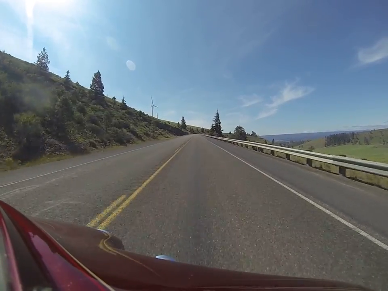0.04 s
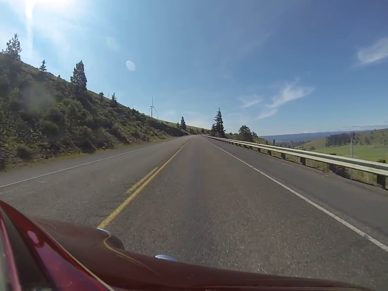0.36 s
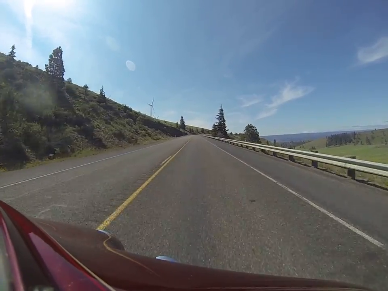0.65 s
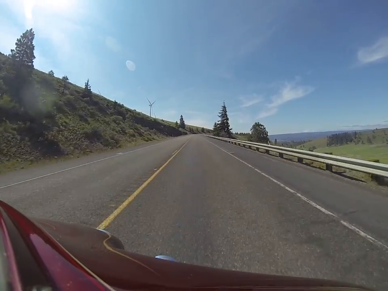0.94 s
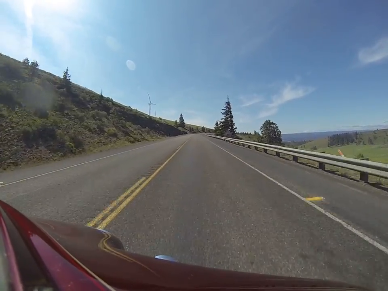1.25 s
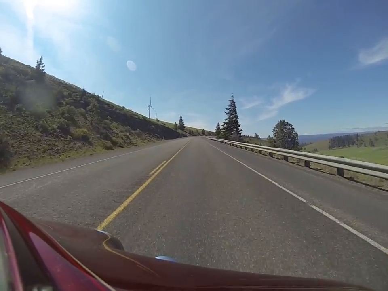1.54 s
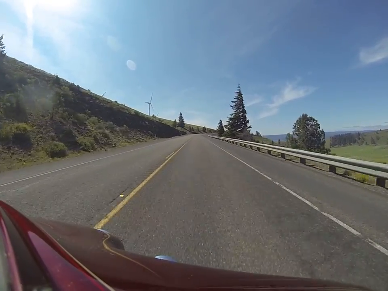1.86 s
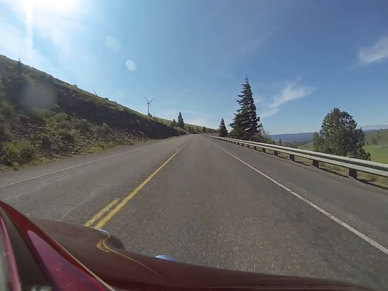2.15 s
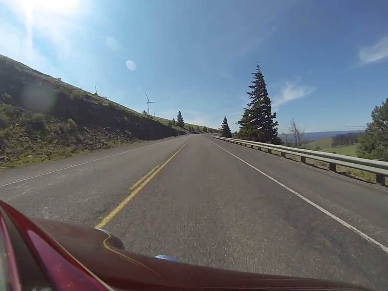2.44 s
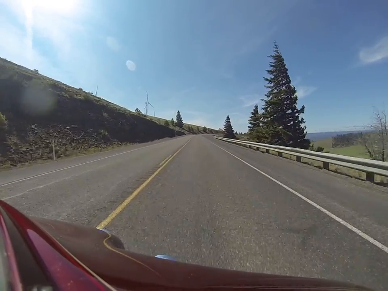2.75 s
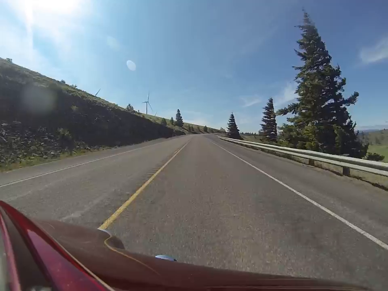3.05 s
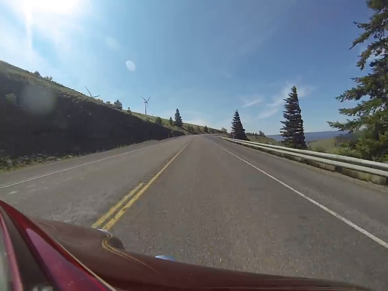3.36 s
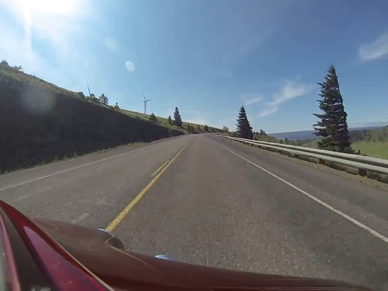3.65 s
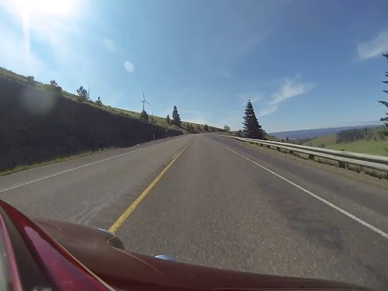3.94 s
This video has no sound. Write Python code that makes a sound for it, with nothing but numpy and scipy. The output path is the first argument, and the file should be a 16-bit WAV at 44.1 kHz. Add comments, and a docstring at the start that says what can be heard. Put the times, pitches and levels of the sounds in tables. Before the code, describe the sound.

A car driving along, with a steady low road roar under gusty wind hiss.

```python
"""A low roar under a gusty hiss: a vehicle cruises an open road, heard from a camera on its bodywork.
Rough asphalt drives the body into forced vibration, with a faint drone of wheels and engine in it.
Turbulent air rushes over the camera housing and excites the resonance of its hollow near 1.4 kHz.
The hiss and a soft low buffeting swell and drop together with the gusts."""
import sys
import numpy as np
from scipy import signal
from scipy.fft import rfft, irfft
from scipy.io import wavfile
from scipy.ndimage import uniform_filter1d, minimum_filter1d

SR = 44100
rng = np.random.default_rng(int(sys.argv[2]) if len(sys.argv) > 2 else 0)


def output_pcm(signal):
    """Save a mono or channel-first signal as 16-bit PCM at the path in sys.argv[1].

    Samples are clipped to [-1, 1] before scaling.
    """
    pcm = np.clip(np.atleast_2d(signal).T, -1, 1) * 32767
    wavfile.write(sys.argv[1], SR, np.round(pcm).astype(np.int16))


N = 176400

# Strength of the airstream. Each row: time in seconds, level in dB.
GUSTS = [(0, -30), (0.15, -20), (0.21, -27.5), (0.28, -23), (0.39, -23), (0.42, -25), (0.57, -23),
         (0.61, -25), (0.78, -26.5), (0.86, -22.0), (1.14, -23.5), (1.18, -27.5), (1.29, -23),
         (1.41, -25.5), (1.45, -29.5), (1.49, -27), (1.56, -28.5), (1.63, -24.5), (1.69, -31.5),
         (1.76, -25.5), (1.94, -22), (1.98, -26.0), (2.02, -20.5), (2.07, -26), (2.2, -22.8), (2.5, -23.5),
         (2.72, -22), (3.06, -23), (3.13, -26), (3.19, -23), (3.4, -24), (3.47, -26), (3.66, -23.4),
         (3.78, -24), (4.0, -25.5)]


def amp(db):
    """Amplitude ratio of a level: a factor of ten for every 20 dB."""
    return 10 ** (np.asarray(db) / 20)


def unit_rms(x):
    """Normalisation to a mean power of one."""
    return x / np.sqrt(np.mean(x ** 2) + 1e-20)


def spectrum_db(points, hz):
    """Interpolation of a spectrum in dB along a logarithmic frequency axis."""
    point_hz, db = np.transpose(points)
    return np.interp(np.log(hz + 1), np.log(point_hz + 1), db)


def curve(points, t):
    """Linear interpolation of a control curve at the times t."""
    return np.interp(t, *np.transpose(points))


def noise(gain):
    """Spectral shaping: white noise weighted by gain(Hz), then scaled to an rms of one."""
    hz = np.fft.rfftfreq(N, 1 / SR) + 1e-3
    return unit_rms(irfft(rfft(rng.standard_normal(N)) * gain(hz), N))


def drift(rate_hz):
    """Random modulation: low-pass noise that moves between 1 Hz and about rate_hz."""
    return noise(lambda hz: (hz > 1) / (1 + (hz / rate_hz) ** 4))


def road_roar(t, split_hz=144, top_hz=560):
    """Forced vibration: asphalt shakes the body into a boom and a panel hum that swell separately."""
    # Response of the bodywork. Each row: frequency in Hz, relative spectral density in dB.
    body_response = [(3, -42), (9, -29), (22, -5), (32, -3), (44, -5.5), (53, -19.5), (64, -12.5),
                     (78, -4.5), (88, -5.5), (104, -1), (124, -7), (150, -9.5), (178, -20), (198, -12),
                     (222, -22), (265, -22), (292, -7), (310, -8.5), (335, -10), (352, -15.5), (370, -10.5),
                     (400, -25.5), (435, -31), (520, -42.5)]
    # Swell of the low boom. Each row: time in seconds, relative level in dB.
    boom_levels = [(0, -17.5), (0.18, -14.5), (0.33, -21), (0.6, -14), (1.3, -16.5), (2.2, -15.5),
                   (2.42, -15), (2.6, -20.5), (2.8, -14.5), (3.15, -12.5), (3.6, -14.5), (4.0, -12.5)]
    # Swell of the panels' hum above it. Each row: time in seconds, relative level in dB.
    hum_levels = [(0, -24), (0.5, -23), (0.7, -22), (0.9, -19.5), (1.1, -22.5), (1.6, -24.5), (2.2, -22),
                  (2.38, -17.5), (2.55, -23), (3.0, -20.5), (3.55, -21), (3.82, -20), (4.0, -21.5)]

    def body(hz):
        return amp(spectrum_db(body_response, hz)) / (1 + (hz / top_hz) ** 12)

    def low_share(hz):
        return 1 / (1 + (hz / split_hz) ** 16)

    boom = noise(lambda hz: body(hz) * np.sqrt(low_share(hz)))
    hum = noise(lambda hz: body(hz) * np.sqrt(1 - low_share(hz)))
    return boom * amp(curve(boom_levels, t) - 1.5) + hum * amp(curve(hum_levels, t) - 0.5)


def airstream_hiss(t, low_cut_hz=475, flutter_db=0.7, patch_db=0.55):
    """Cavity resonance: turbulence rings the housing's hollow, louder and a little brighter in gusts."""
    # Colour of the air rushing over the housing. Each row: frequency in Hz, relative density in dB.
    housing_response = [(300, -40), (500, -16.5), (600, -22.5), (720, -17), (850, -19.5), (1000, -16),
                        (1150, -12), (1330, -1.5), (1420, 2.5), (1560, -2.5), (1700, -9.5), (1850, -16),
                        (2050, -20), (2300, -22.5), (2600, -20), (2800, -23), (3080, -18.5), (3450, -22.5),
                        (3900, -28.5), (4380, -35), (5000, -28.5), (5850, -39.5), (6500, -34.5),
                        (7500, -35), (8200, -39.5), (8900, -45.5), (11200, -47), (12200, -52), (13300, -49),
                        (14600, -56)]
    size, hop = 512, 128
    frames, hz = N // hop + 5, np.fft.rfftfreq(size, 1 / SR)
    real, imag, eddies = rng.standard_normal((3, frames, len(hz)))
    # Eddies vary the level in local patches of time and frequency.
    eddies = uniform_filter1d(eddies, size=16, axis=0)
    eddies = unit_rms(uniform_filter1d(eddies, size=12, axis=1))
    gust_db = curve(GUSTS, np.arange(frames) * hop / SR)
    octaves_above_ring = np.log2(np.maximum(hz / 1400, 1))
    brightening_db = 0.032 * np.outer(gust_db - gust_db.mean(), octaves_above_ring)
    colour_db = spectrum_db(housing_response, hz) + patch_db * eddies + brightening_db
    low_cut = 1 / (1 + (low_cut_hz / (hz + 1)) ** 8)
    spectra = (real + 1j * imag) * amp(colour_db) * low_cut
    hiss = signal.istft(spectra.T, nperseg=size, noverlap=size - hop)[1][:N]
    flutter = flutter_db * drift(rate_hz=45)  # eddies that move all frequencies together
    return unit_rms(hiss) * amp(curve(GUSTS, t) + flutter + 0.13)


def buffeting(t, centre_hz=200, width_octaves=0.59):
    """Pressure fluctuation: the same gusts push on the housing with a soft low rush."""
    rush = noise(lambda hz: np.exp(-0.5 * (np.log2(hz / centre_hz) / width_octaves) ** 2))
    return rush * amp(curve(GUSTS, t) - 7.5)


def running_gear_drone(wander_rate_hz=7.4, waver_db=2.5):
    """Periodic excitation: turning wheels and engine give low tones that waver in pitch and level."""
    # Tones of the running gear. Each row: frequency in Hz, level in dB, rms pitch wander in Hz.
    tones = [(21.5, -23.5, 1), (43.47, -28, .7), (104, -24, 6), (194, -40, 2.2), (309.7, -33, 3.04)]
    drone = np.zeros(N)
    for hz, db, wander_hz in tones:
        pitch = hz + wander_hz * drift(wander_rate_hz)
        cycles = np.cumsum(pitch) / SR + rng.random()
        waver = amp(waver_db * drift(wander_rate_hz))
        drone += amp(db) * unit_rms(np.sin(2 * np.pi * cycles) * waver)
    return drone


def scene():
    """Superposition: the pressures of road, running gear and wind add at one microphone."""
    t = np.arange(N) / SR
    return (road_roar(t) + running_gear_drone() + airstream_hiss(t) + buffeting(t))[None]


def record(dry, ceiling=1, edge_hz=14950):
    """Peak and band limiting: the gain dips around any peak over the ceiling, then a low-pass follows."""
    allowed_gain = np.minimum(1, ceiling / (abs(dry) + 1e-9))
    gain = uniform_filter1d(minimum_filter1d(allowed_gain, size=441), size=441)  # 10 ms hold and ease
    low_pass = signal.firwin(511, edge_hz, window=("kaiser", 9), fs=SR)
    return signal.oaconvolve(dry * gain, low_pass[None], "same")


dry = scene()
out = record(dry)
output_pcm(out)
```